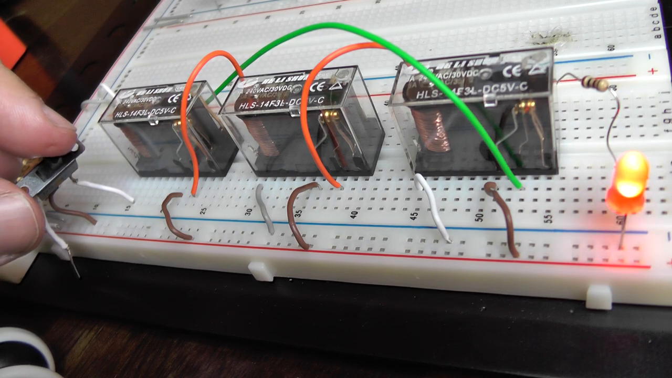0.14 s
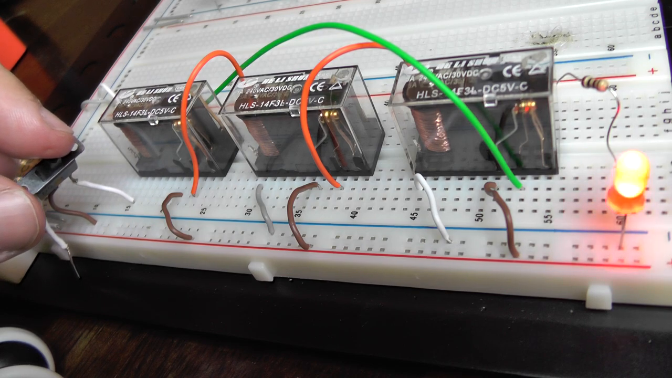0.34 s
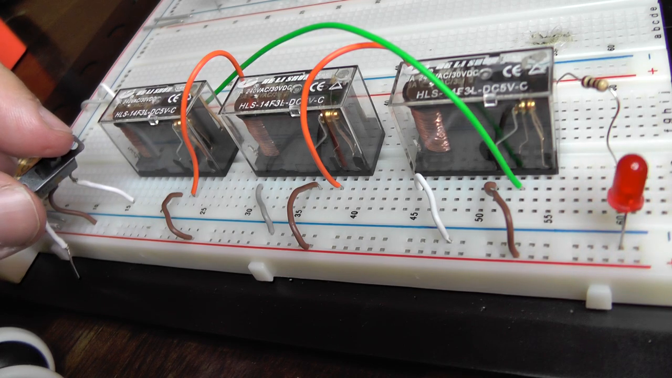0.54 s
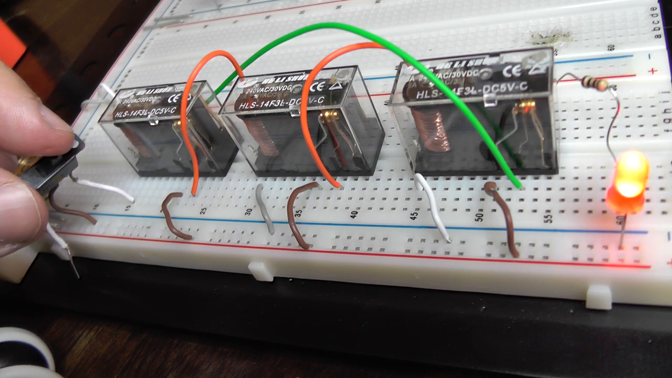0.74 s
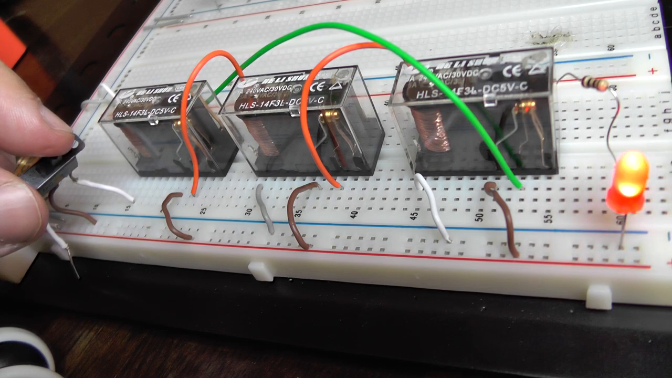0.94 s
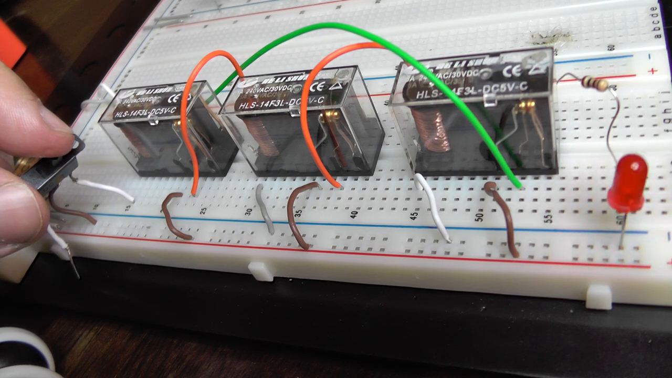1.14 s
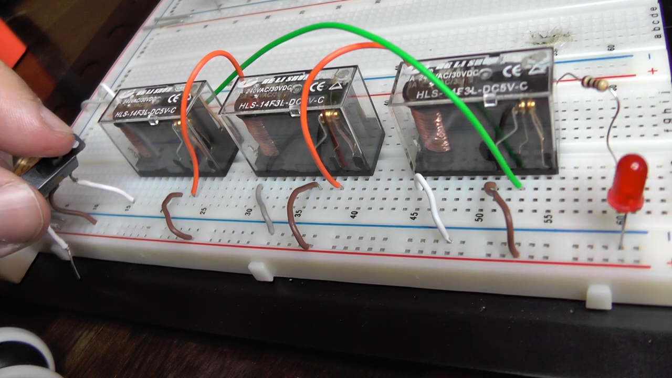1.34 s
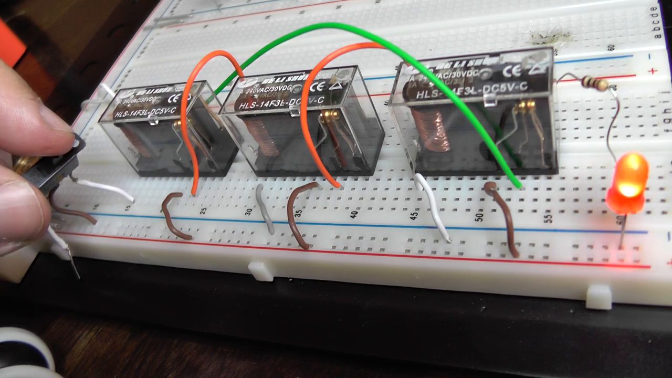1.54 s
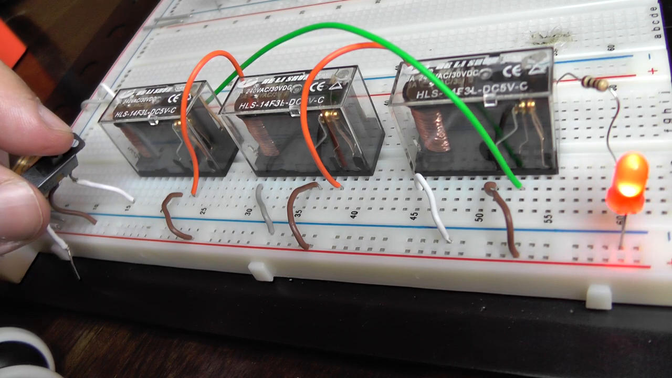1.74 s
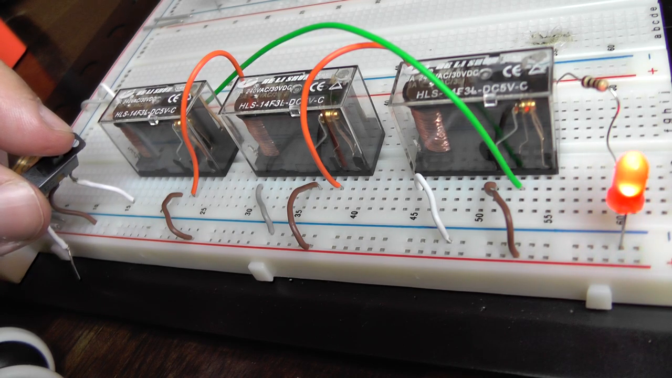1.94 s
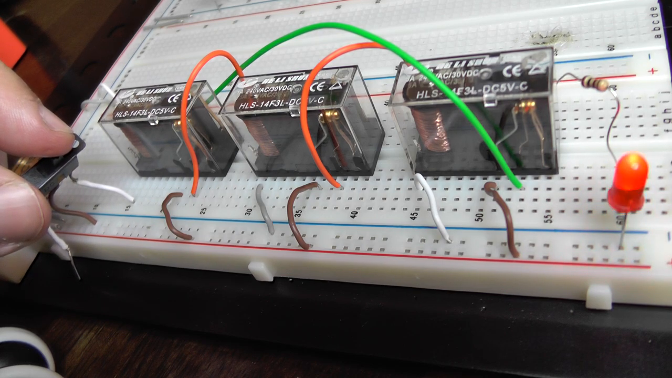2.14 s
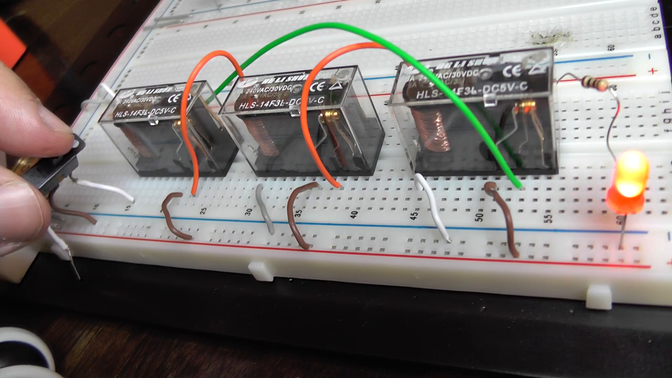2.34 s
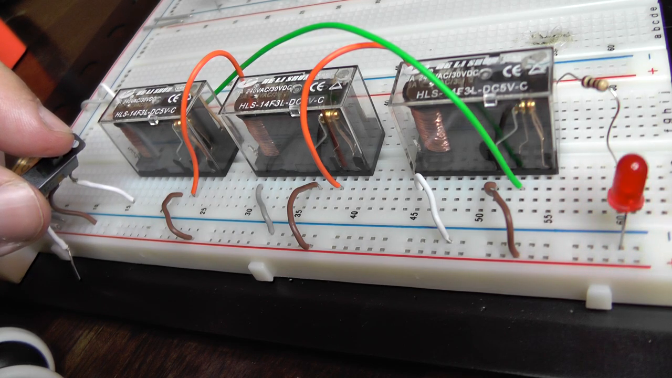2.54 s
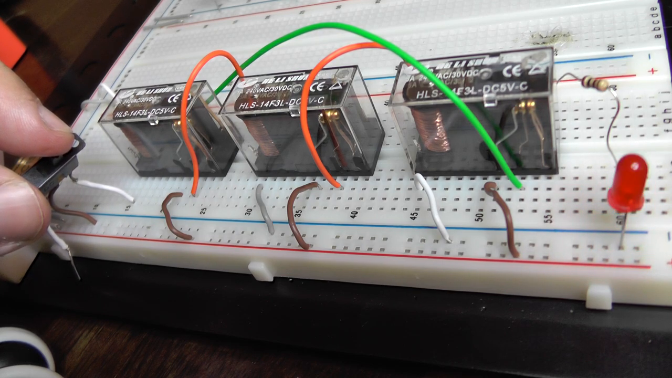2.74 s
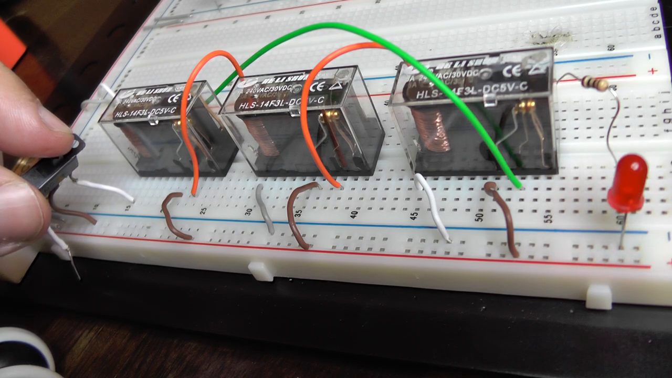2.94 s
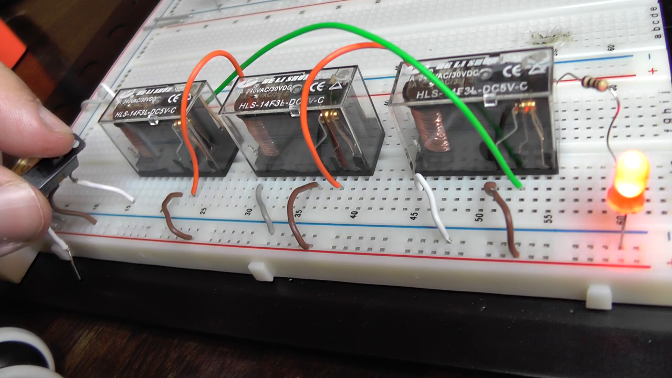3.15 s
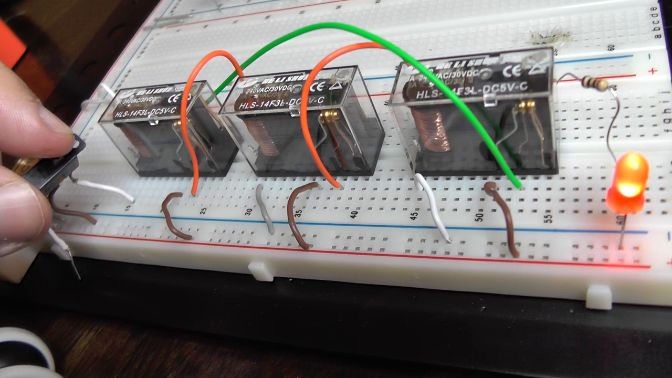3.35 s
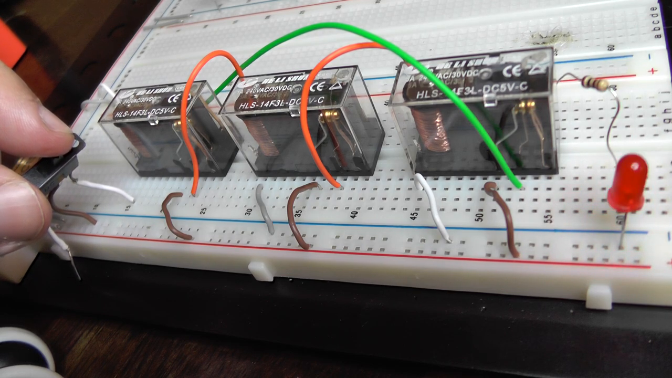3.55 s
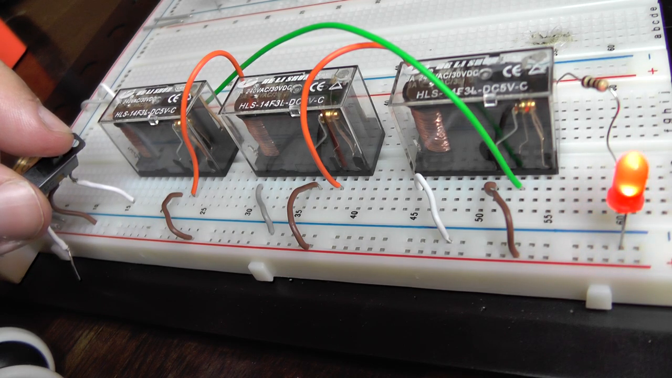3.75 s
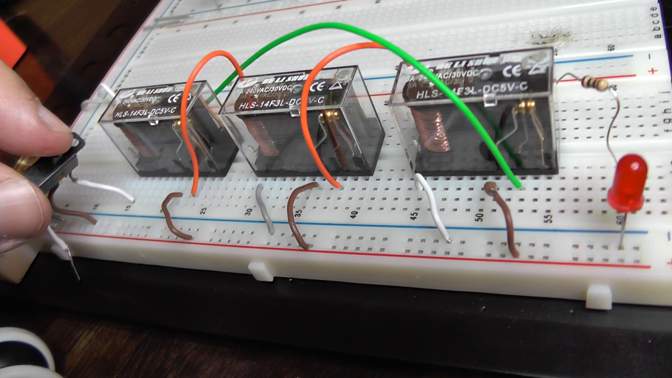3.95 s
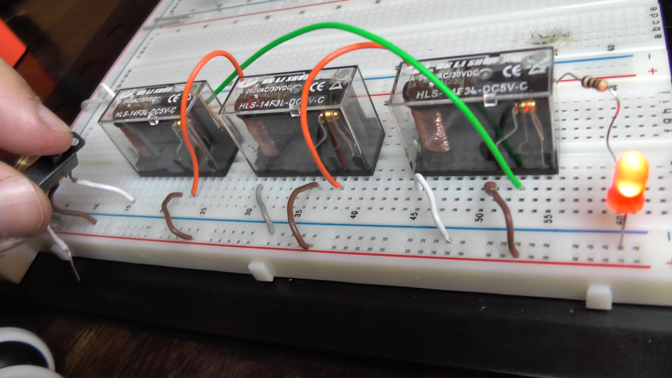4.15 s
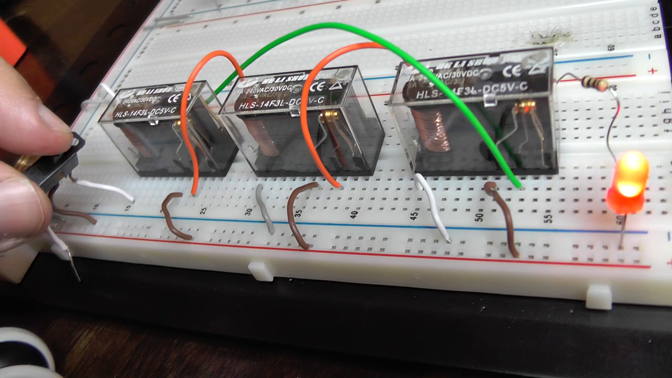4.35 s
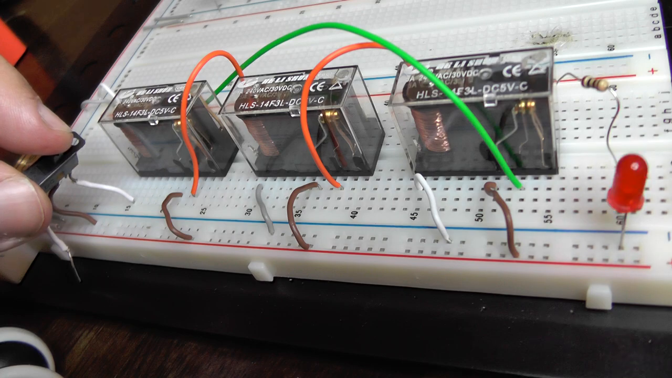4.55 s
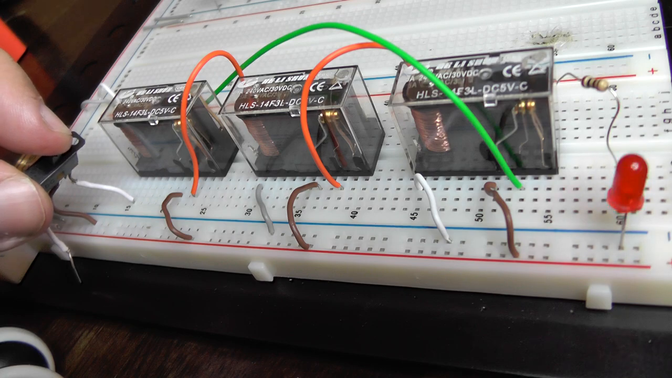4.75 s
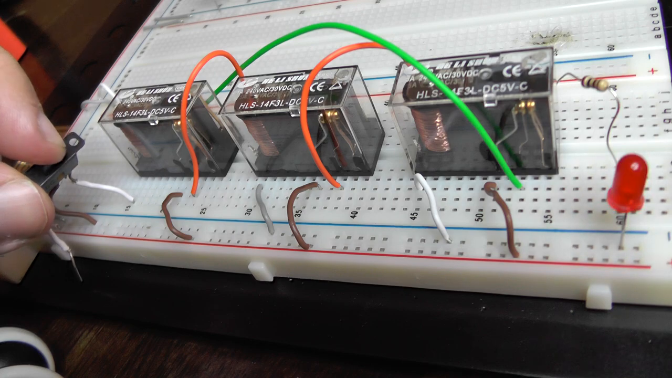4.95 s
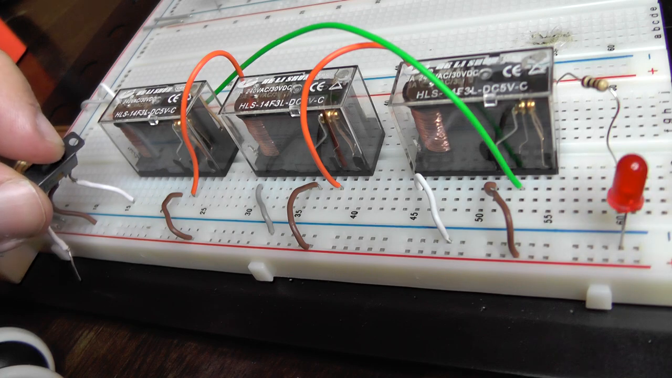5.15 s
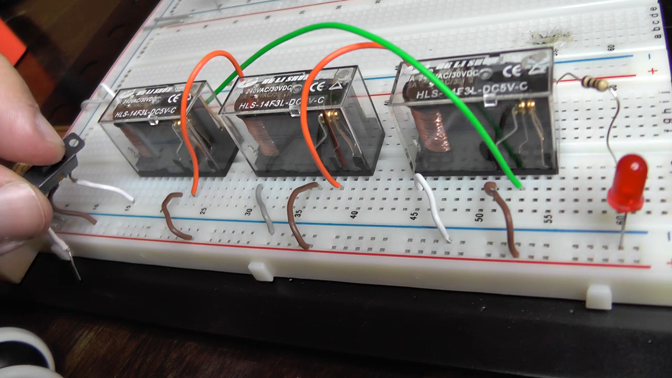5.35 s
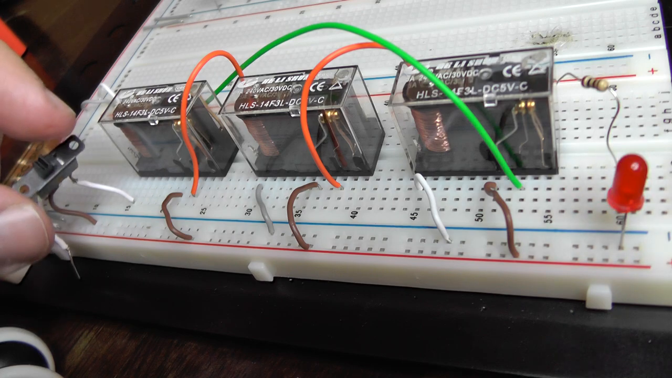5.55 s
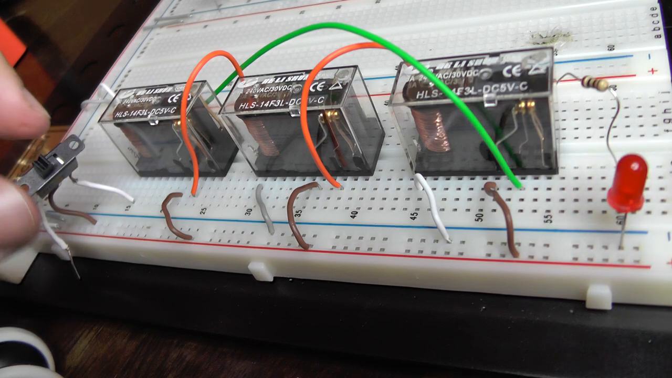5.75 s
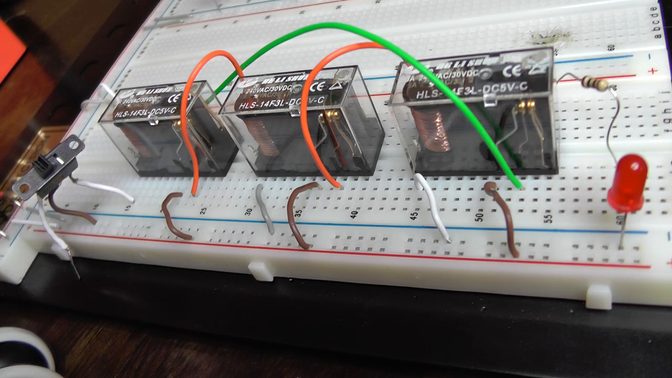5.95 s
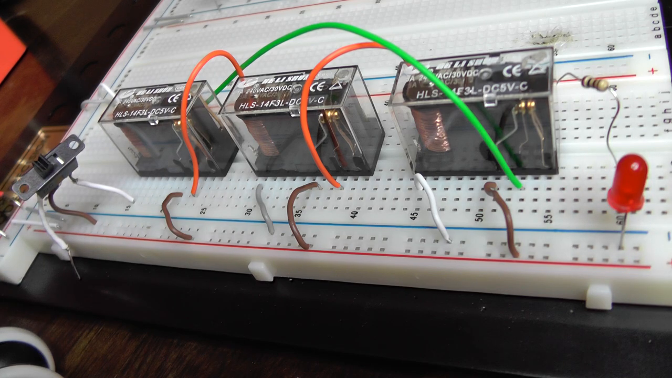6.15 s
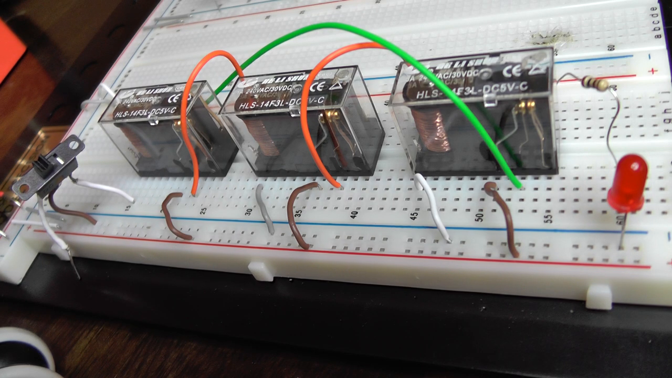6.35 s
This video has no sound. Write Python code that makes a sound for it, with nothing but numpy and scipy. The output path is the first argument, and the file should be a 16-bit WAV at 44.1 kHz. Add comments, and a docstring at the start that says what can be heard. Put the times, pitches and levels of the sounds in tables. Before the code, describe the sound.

A harsh mechanical buzz made of separate fast clacks, some weak, some cut short, with thin contact rattle and a little woody board resonance. Soft low bumps lie underneath. After nearly five seconds a switch ends it at once; a short room tail fades and steady soft noise rises as the automatic level recovers, with a tiny tick about a second later. Close stereo pickup, small room.

```python
"""A small room: three relays wired in a ring on a breadboard on a desk, close to two microphones.
They trip one another about 25 laps a second, each armature a shaped noise burst through its own resonances.
Some strokes are weak and some laps are cut short; desk echoes and a diffuse room tail surround them.
A switch stops them and the room rings out; the gain control recovers, so the steady room noise swells up.
Soft low bumps run under the buzz, and one faint tick of handling follows it."""
import sys
import numpy as np
from scipy import signal
from scipy.fft import rfft, irfft
from scipy.io import wavfile
from scipy.ndimage import uniform_filter1d

SR = 44100
rng = np.random.default_rng(int(sys.argv[2]) if len(sys.argv) > 2 else 0)


def put_to_file(sound):
    """Save the sound as 16-bit audio at rate SR, in the file named by the first command-line argument."""
    columns = np.atleast_2d(sound).T  # one column per channel
    safe = np.clip(columns, -1, 1)
    whole_steps = np.round(safe * 32767)
    wavfile.write(sys.argv[1], SR, whole_steps.astype(np.int16))


N = 286650

# the ring is already running at the start, until the switch opens (s)
FIRST_LAP_S, STOP_S = -.0105, 4.9315
# a usual lap, and the shortest one that still reaches the third relay (s)
LAP_S, SHORTEST_LAP_S = .04, .032
# frequencies at which resonances and echo colours are drawn (Hz)
GRID_HZ = np.fft.rfftfreq(4096, 1 / SR)
# stroke of each relay, one row a relay, levels relative:
# level/dB, rise/s, decay/s, first knock level/dB, loose rattle level/dB, rattle decay/s
STROKES = [(0.36, 0.00014, 0.003, -4, -3.5, 0.0068), (0, 0.00048, 0.0017, -10, -1, 0.0048),
           (-0.5, 0.00112, 0.0032, -29, 0, 0.0061)]
# resonances of the second relay's frame, springs and cover: f/Hz, width/Hz, level/dB
SECOND_RELAY = [(2205, 102, 7.4), (3620, 180, 5.9), (4050, 84, 7.7), (5160, 170, 7.7), (7180, 385, 11.1),
                (7920, 39, 12.6), (9080, 62, 6.3), (10700, 81, 5.5), (12260, 120, 8.3), (13700, 156, 4.5),
                (14800, 154, 7.3)]


def gain_of(db):
    """Decibels to amplitude."""
    return 10 ** (np.asarray(db) / 20)


def unit(x):
    """Scales to energy 1, each channel by itself."""
    return x / np.sqrt(np.sum(x ** 2, -1, keepdims=True) + 1e-20)


def read(points, hz):
    """A table of (f/Hz, value), joined on a log-frequency axis."""
    f, value = np.transpose(points)
    return np.interp(np.log(hz + 1), np.log(f + 1), value)


def split(x, hz):
    """The parts of a sound below and above hz."""
    low = signal.butter(3, hz, "low", fs=SR, output="sos")
    high = signal.butter(3, hz, "high", fs=SR, output="sos")
    return signal.sosfilt(low, x), signal.sosfilt(high, x)


def convolve(x, response):
    """Convolution, cut to the length of the scene."""
    return signal.oaconvolve(x, response)[:N]


def humps(resonances):
    """Resonances as bell-shaped rises in dB."""
    return sum(db * np.exp(-.5 * ((GRID_HZ - hz) / width) ** 2) for hz, width, db in resonances)


def ringing(db):
    """The minimum-phase impulse response with this spectrum: energy comes as early as it can."""
    log_gain = np.log(gain_of(np.r_[db, db[-2:0:-1]]))
    spectrum = np.exp(np.conj(signal.hilbert(log_gain)))
    return np.fft.ifft(spectrum).real[:len(db)]


def burst(envelope, count=12):
    """A random pattern of bounces under an envelope, with a flat spectrum."""
    x = envelope * rng.standard_normal(len(envelope))
    # envelope and flatness are imposed in turn until they nearly agree
    for _ in range(count):
        local_rms = np.sqrt(abs(uniform_filter1d(x ** 2, size=40)) + 1e-14)
        x = x * envelope / local_rms
        phase = np.angle(rfft(x))
        x = irfft(np.exp(1j * phase), len(x))
    return unit(x)


def room_noise(level_db=-48):
    """A low steady rush of shaped noise with faint hiss above it, nearly alike at both microphones."""
    # spectrum of the room noise, relative: f/Hz, level/dB
    colour = [(15, -75), (25, -22), (58, -11.5), (206, -2), (476, -7), (545, -7.5), (911, -15.5),
              (1650, -17), (2280, -24.5), (3340, -21.5), (3720, -24.5), (4490, -24.5), (8140, -33),
              (16000, -36)]
    # side against middle: f/Hz, level/dB
    width = [(60, -18), (130, -24), (290, -19), (640, -14), (1410, -19), (3100, -25), (6820, -19),
             (15000, -27)]
    hz = np.fft.rfftfreq(N, 1 / SR)
    middle, side = rfft(rng.standard_normal((2, N)))
    side = side * gain_of(read(width, hz))
    pair = irfft(np.array([middle + side, middle - side]) * gain_of(read(colour, hz)), N)
    return gain_of(level_db) * np.sqrt(N) * unit(pair)


def tick():
    """A faint tick of handling: one short dull tap of band-passed noise that dies exponentially."""
    # the tap: t/s, level/dB, f/Hz, decay/s
    tap = (6.061, -45.5, 1050, .008)
    start, db, hz, decay = tap
    t = np.arange(N) / SR - start
    band = signal.butter(2, [hz / 2, hz * 2], "band", fs=SR)
    noise = signal.lfilter(*band, rng.standard_normal(N))
    return gain_of(db) * np.sqrt(N) * unit(noise) * (t > 0) * np.exp(-abs(t) / decay)


def thuds(per_s=30, level_db=-58, top_hz=130):
    """An uneven low rumble while the relays run: random soft pushes, low-passed."""
    happens = rng.random(N) < per_s / SR
    running = np.arange(N) < STOP_S * SR
    pushes = rng.standard_normal(N) * happens * running
    rumble, _ = split(pushes, top_hz)
    return gain_of(level_db) * np.sqrt(N) * unit(rumble)


def room(x, apart=0.19):
    """A diffuse noise tail, each band dying at its own rate, partly different at the two microphones."""
    # time to fall by 60 dB: f/Hz, t60/s
    decay_times = [(250, 1), (1100, 0.63), (4000, 0.73), (7800, 0.63), (11000, 0.52), (16000, 0.3)]
    # strength of the tail: f/Hz, level/dB
    strength = [(250, -10), (1130, -8), (1700, -18.5), (2280, -20.5), (2800, -10), (3450, -18.5),
                (4200, -7.5), (5500, -15), (7700, -11.5), (10000, -25), (16000, -14)]
    middle, side = rng.standard_normal((2, SR))
    pair = np.array([middle + apart * side, middle - apart * side])
    hz, t, z = signal.stft(pair, SR, nperseg=256)
    t60 = read(decay_times, hz)[:, None]
    z = z * np.exp(-np.log(1000) * t / t60) * gain_of(read(strength, hz))[:, None]
    # evens out the energy that a longer decay would add
    z = z * np.sqrt(2 * np.log(1000) / (t60 * SR * (1 + apart ** 2)))
    tails = signal.istft(z, SR, nperseg=256)[1]
    fade_in = np.minimum(np.arange(tails.shape[1]) / SR / 0.0047, 1)  # over 4.7 ms
    return np.array([convolve(x, tail) for tail in tails * fade_in])


def desk(x, decay_s=0.0097):
    """Near echoes off the desk that add at one microphone and subtract at the other."""
    # colour of the echoes: f/Hz, level/dB
    echo_colour = [(100, -4.5), (400, -11), (700, -6.5), (1300, -25.5), (3000, -19), (6000, -15.5),
                   (10000, -21), (15000, -40)]
    echoes = burst(np.exp(-np.arange(len(GRID_HZ)) / SR / decay_s))
    side = convolve(x, signal.fftconvolve(echoes, ringing(read(echo_colour, GRID_HZ))))
    return np.array([side, -side])


def casing(resonances):
    """How one relay rings on the breadboard: overall colour, board and relay resonances in one response."""
    # overall colour of a clack: f/Hz, level/dB
    body = [(30, -26), (150, -23), (280, -18), (600, -22), (1000, -15.5), (1500, -0.73), (3000, 1.5),
            (5000, -3.5), (9000, -3), (13000, -4.5), (15500, -5), (16400, -8.5)]
    # breadboard and desk resonances: f/Hz, width/Hz, level/dB
    board = [(317.8, 18.3, 11.5), (392.7, 11, 16), (469.3, 20, 12), (730.5, 71, 12.5), (863, 30, 8.5),
             (998, 39, 6), (1116, 5.3, 7.5), (1165, 83, 13), (1352, 53.5, 10), (1580, 44, 1),
             (2318, 142, 6)]
    return unit(ringing(read(body, GRID_HZ) + humps(board) + humps(resonances)))


def laps():
    """Starts and lengths (s) of all laps: between stumbles, a whole number of laps at a drifting pace."""
    # time the ring takes for one lap, before rounding to whole laps: t/s, lap/s
    pace = [(0.0, 0.0384), (0.1, 0.0415), (0.3, 0.0383), (1.3, 0.0424), (2.0, 0.0378), (2.1, 0.0412),
            (2.3, 0.0423), (2.8, 0.0399), (2.9, 0.0411), (3.1, 0.0377), (3.3, 0.0419), (3.9, 0.0383),
            (4.0, 0.0412), (4.2, 0.0413), (4.3, 0.0394), (4.8, 0.0411)]
    # laps in which the second relay fails to seat and the ring trips early: t/s, length/s
    stumbles = [(0.5048, 0.0332), (0.5379, 0.0212), (0.6001, 0.0249), (0.6249, 0.0387), (0.7827, 0.0367),
                (0.8591, 0.0362), (1.0162, 0.0367), (1.2901, 0.0351), (1.4036, 0.0353), (1.4794, 0.0331),
                (1.5949, 0.0387), (1.7156, 0.0382), (1.8365, 0.037), (1.8735, 0.021), (1.9772, 0.037),
                (2.5005, 0.0233), (2.8919, 0.0386), (3.1701, 0.0173), (3.2294, 0.0295), (3.2589, 0.0296),
                (3.3671, 0.0301), (3.6401, 0.0365), (3.7559, 0.0202), (3.8171, 0.0385), (4.4998, 0.0295),
                (4.5294, 0.0369)]
    t = np.arange(FIRST_LAP_S, STOP_S, .001)
    turns = np.cumsum(np.gradient(t) / np.interp(t, *np.transpose(pace)))
    trips, lengths = np.transpose(stumbles)
    starts, stumbled = [], []
    for begin, end in zip(np.r_[FIRST_LAP_S, trips + lengths], np.r_[trips, STOP_S]):
        first_turn, last_turn = np.interp([begin, end], t, turns)
        count = round(last_turn - first_turn)
        even_turns = np.linspace(first_turn, last_turn, count, endpoint=False)
        starts += [*np.interp(even_turns, turns, t), end]
        stumbled += [False] * count + [True]
    # the last entry is the switch opening, not a lap
    return np.array(starts[:-1]), np.diff(starts), stumbled[:-1]


def strokes():
    """Each relay's stroke times and forces (s, dB), then the spans in which the second hangs loose."""
    # the second and third relays strike at fixed shares of the lap
    second_share, third_share = .289, .555
    # the second armature needs a full lap to pull in hard: it weakens as the lap shortens, more in a stumble
    full_lap_s, hurry_db_per_s, stumble_db, weakest_db = .041, 1101.5, -7.5, -21
    first, second, third, loose = [], [], [], []
    for start, length, stumbled in zip(*laps()):
        whole = length > SHORTEST_LAP_S  # a lap cut short never reaches the third relay
        hurry_db = hurry_db_per_s * max(full_lap_s - length, 0)
        second_db = max(stumble_db * stumbled - hurry_db, weakest_db)
        second_s = start + second_share * (length if whole else LAP_S)
        next_s = start + (third_share * length if whole else length)
        first.append((start, 0))
        second.append((second_s, second_db))
        if whole:
            third.append((next_s, 0))
        loose.append((second_s, next_s, second_db))
    return first, second, third, loose


def flutter(loose, level_db=-28, bounce_hz=185, depth=0.25):
    """The weaker its stroke, the more the second armature chatters on its spring until the next trips."""
    chatter = np.zeros(N)
    for start, end, force_db in loose:
        at = np.arange(max(0, round(start * SR)), round(end * SR))
        slack = np.sqrt(np.clip(1 - gain_of(force_db) ** 2, .08, 1))
        bounces = 1 + depth * np.sin(2 * np.pi * (bounce_hz * at / SR + rng.random()))
        chatter[at] = slack * bounces * signal.windows.tukey(len(at), .2)
    return gain_of(level_db) * convolve(chatter * rng.standard_normal(N), casing(SECOND_RELAY))


def relay(hits, stroke, resonances, uneven_db=0.55, travel_db=-17.0, travel_s=0.0017,
          sway_s=0.00488, board_hz=1550, thin_db=-2, thin_hz=4500):
    """An armature scrapes across, then knocks and bounces alike each time; its contacts rattle at random."""
    # slow drift of the buzz level, with two step-downs as the recorder's gain drops, relative: t/s, level/dB
    buzz_level = [(0, -28), (.9, -26), (2.2, -25), (2.28, -28), (3.1, -25.5), (3.76, -25), (3.86, -28),
                  (4.9, -26.5)]
    level_db, rise, decay, knock_db, rattle_db, rattle_decay = stroke
    hit_s, force_db = np.transpose([hit for hit in hits if hit[0] >= 0])
    drift_db = np.interp(hit_s, *np.transpose(buzz_level))
    uneven = uneven_db * rng.standard_normal(len(hit_s))
    blows = np.zeros(N)
    blows[np.round(hit_s * SR).astype(int)] = gain_of(drift_db + uneven + force_db)

    t = np.arange(len(GRID_HZ) // 2) / SR
    attack = 1 - np.exp(-t / rise)
    knock = burst(np.exp(-.5 * ((t - .0012) / 0.00043) ** 2))
    bouncing = burst(attack * np.exp(-t / decay))
    seating = unit(bouncing + gain_of(knock_db) * knock)
    # the board carries the low part of each blow; it starts later and shakes for longer than the metal
    shaking = burst(np.sqrt(t / sway_s) * np.exp(-t / sway_s))
    clack = split(seating, board_hz)[1] + split(shaking, board_hz)[0]

    rattle_shape = unit(attack * np.exp(-t / rattle_decay)) ** 2
    rattle_power = convolve(blows ** 2, rattle_shape) * gain_of(rattle_db) ** 2
    # time runs backwards here, so that the scrape grows towards each blow
    travel_shape = unit(np.exp(-t / travel_s)) ** 2
    travel_power = convolve(blows[::-1] ** 2, travel_shape)[::-1] * gain_of(travel_db) ** 2
    loose_noise = np.sqrt(abs(rattle_power + travel_power)) * rng.standard_normal(N)
    # light contacts rattle mostly in the treble
    low, high = split(loose_noise, thin_hz)
    drive = convolve(blows, clack) + gain_of(thin_db) * low + high
    # blow energy spread over a third of a lap
    per_stroke = np.sqrt(LAP_S * SR / len(STROKES))
    return gain_of(level_db) * per_stroke * convolve(drive, casing(resonances))


def scene(buzz_db=17):
    """The three relays close to the microphones, in a small room."""
    # resonances of the first and third relays' frame, springs and cover: f/Hz, width/Hz, level/dB
    first_relay = [(1150, 38, 7.3), (2932, 68, 6.9), (3451, 111, 9.3), (3802, 77, 10.6), (5924, 107, 6.9),
                   (7393, 336, 8.4), (8139, 113, 8.8), (9203, 200, 6.3), (10584, 103, 5.2),
                   (12065, 442, 7.1), (14619, 204, 5.4)]
    third_relay = [(811, 50, 9.5), (2259, 24, 3.4), (3273, 60, 8.6), (4340, 125, 5.3), (5480, 25, 6.9),
                   (6665, 69, 10.5), (8000, 220, 8.4), (8640, 260, 4.6), (10630, 290, 8.3),
                   (11500, 110, 4.5), (12160, 630, 5.2)]
    *hits, loose = strokes()
    clacks = sum(relay(*part) for part in zip(hits, STROKES, (first_relay, SECOND_RELAY, third_relay)))
    buzz = gain_of(buzz_db) * (clacks + flutter(loose))
    return buzz + desk(buzz) + room(buzz) + room_noise() + thuds() + tick()


def record(dry, threshold_db=-39, slope=0.53, recovery_db_per_s=42, ceiling=0.37, edge_hz=16500):
    """Gain control holds the buzz down and recovers slowly after it; then the band limit."""
    power = uniform_filter1d((dry ** 2).mean(0), size=2600)
    power_db = 10 * np.log10(abs(power) + 1e-12)
    fall = recovery_db_per_s * np.arange(N) / SR
    # follows rises of the smoothed level and falls no faster than the recovery
    held_db = np.maximum.accumulate(power_db + fall) - fall
    over_db = np.maximum(held_db - threshold_db, 0)
    ducked = dry / gain_of(slope * uniform_filter1d(over_db, size=400))
    ducked = ceiling * np.tanh(ducked / ceiling)  # the sharpest knocks are rounded off
    low_pass = signal.firwin(401, edge_hz, window=("kaiser", 9), fs=SR)
    return signal.oaconvolve(ducked, low_pass[None], "same")


dry = scene()
out = record(dry)
put_to_file(out)
```